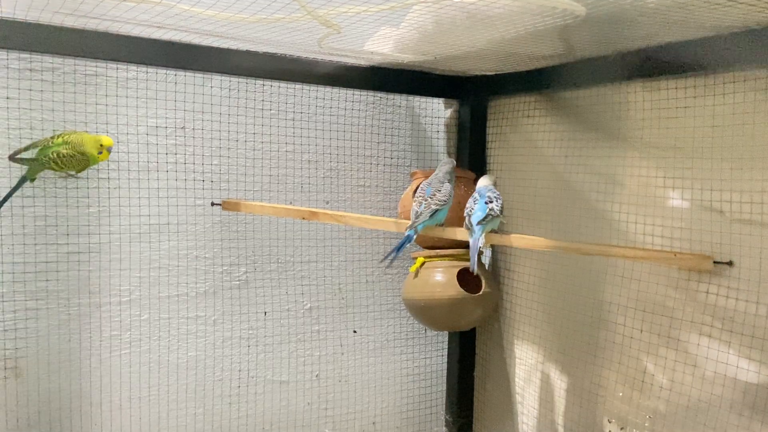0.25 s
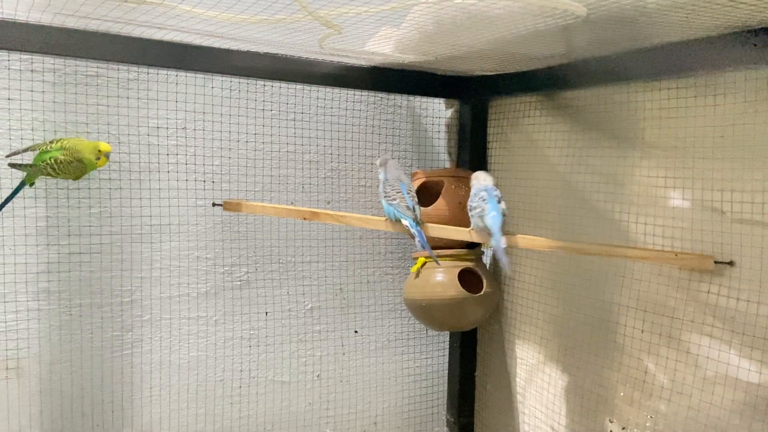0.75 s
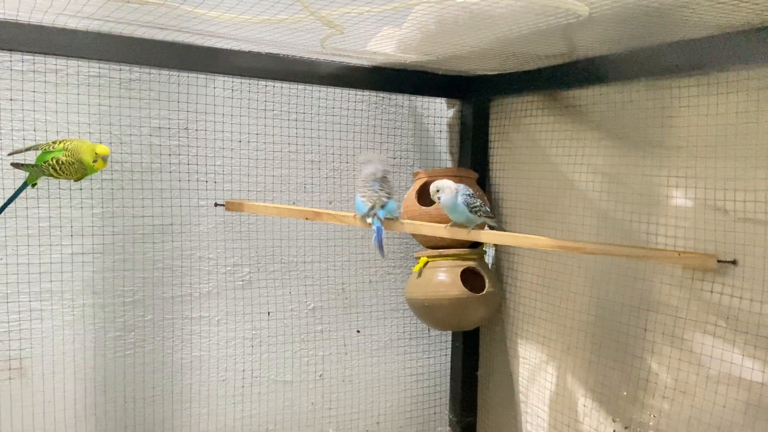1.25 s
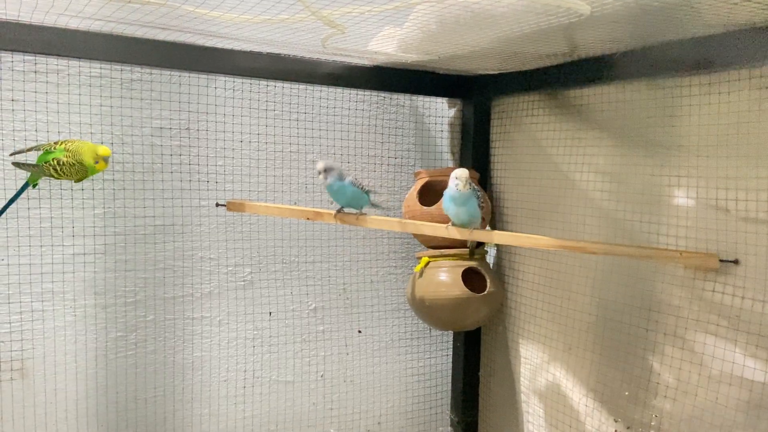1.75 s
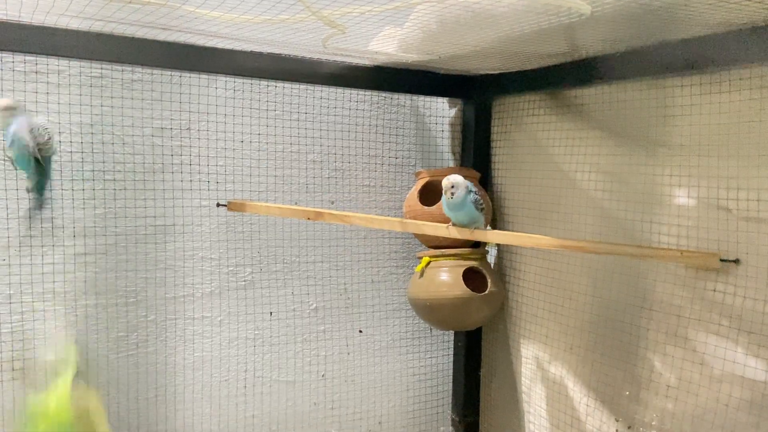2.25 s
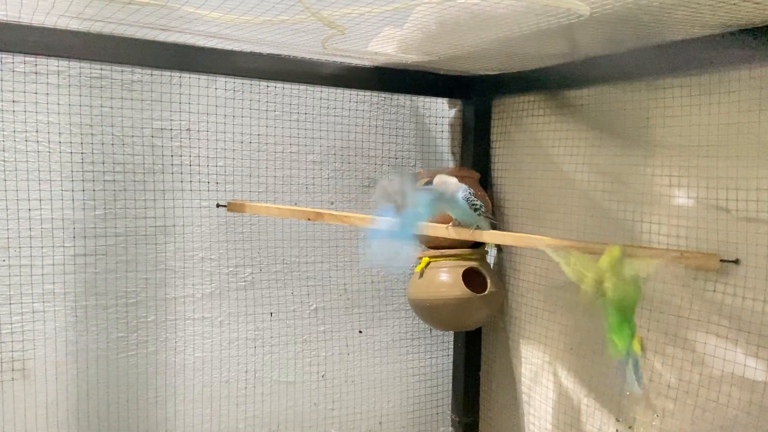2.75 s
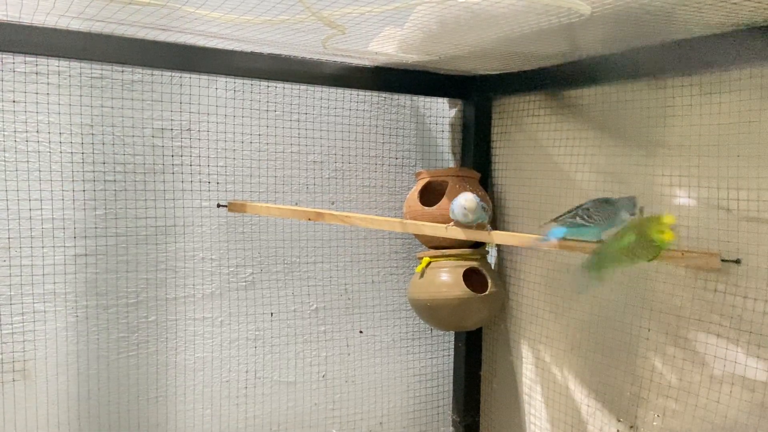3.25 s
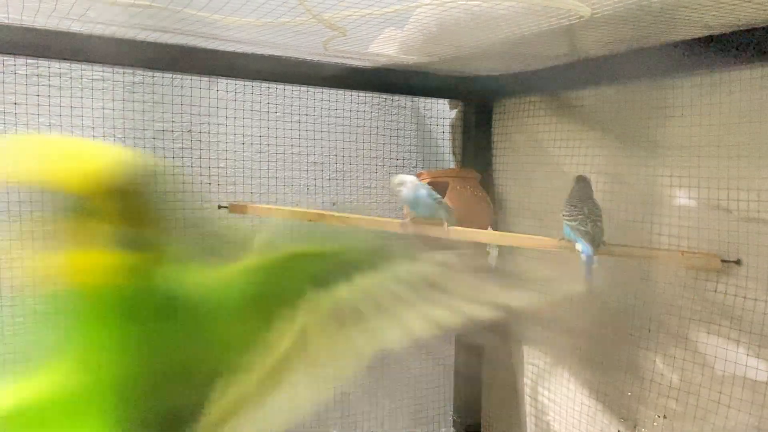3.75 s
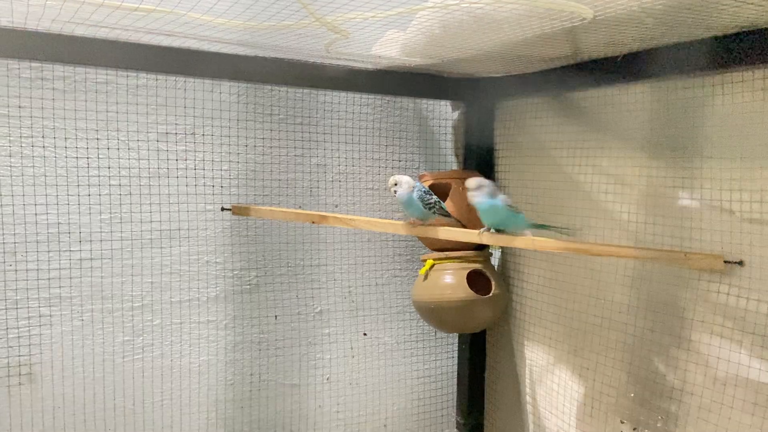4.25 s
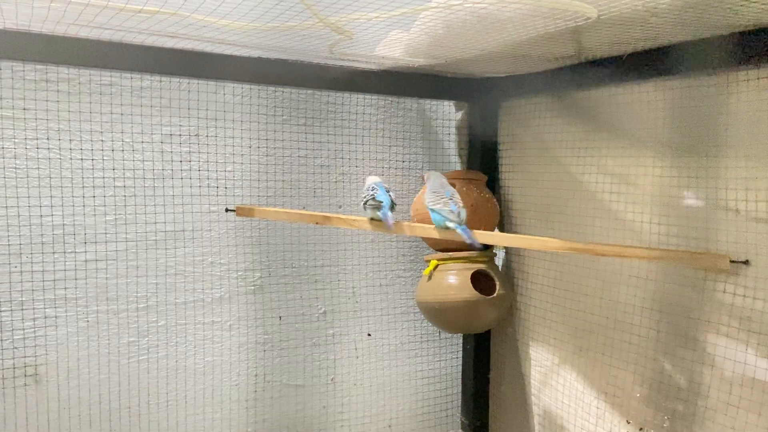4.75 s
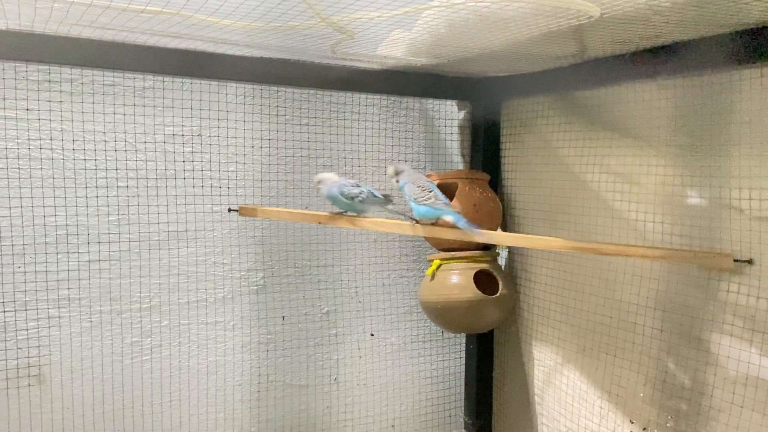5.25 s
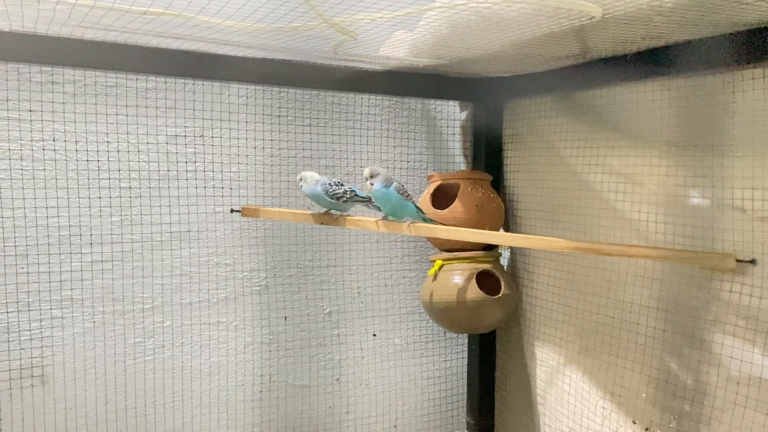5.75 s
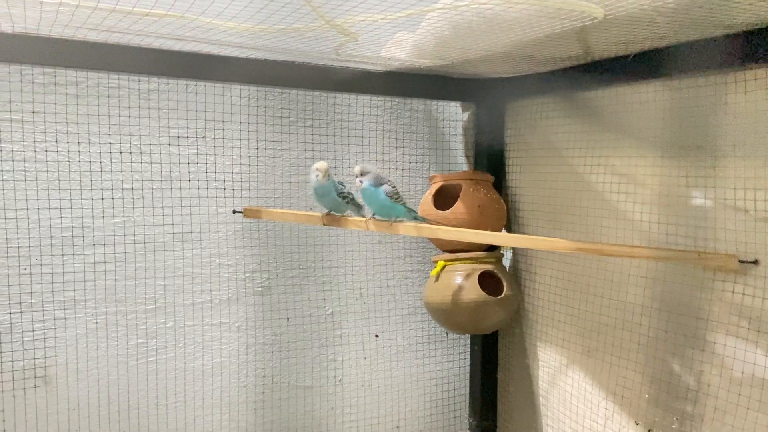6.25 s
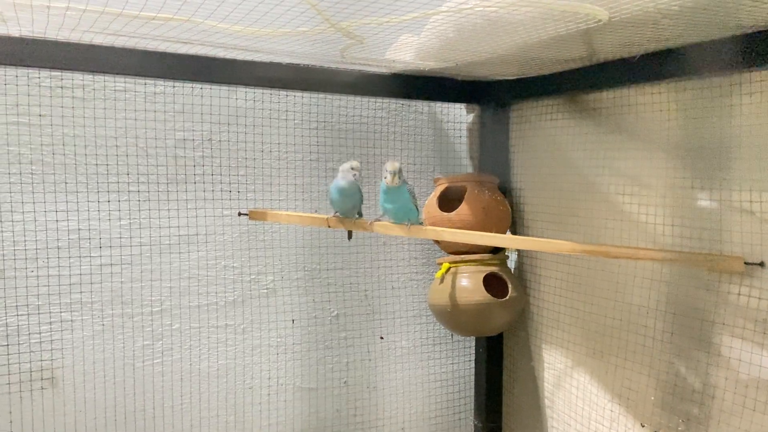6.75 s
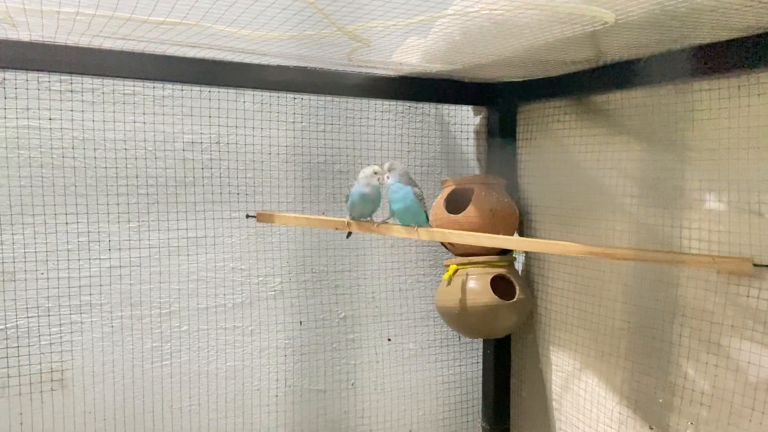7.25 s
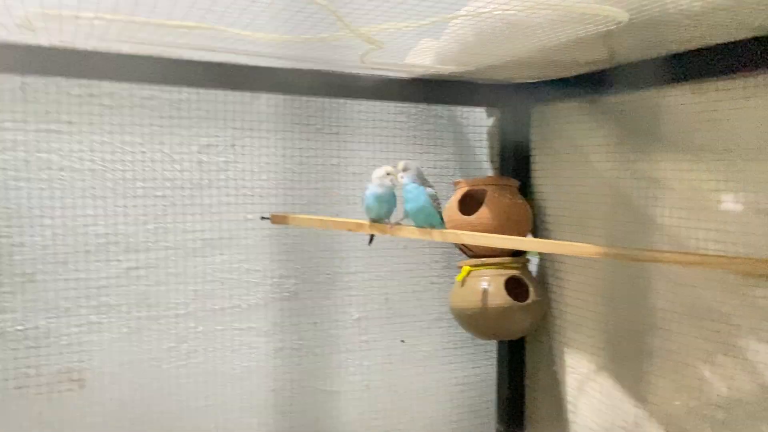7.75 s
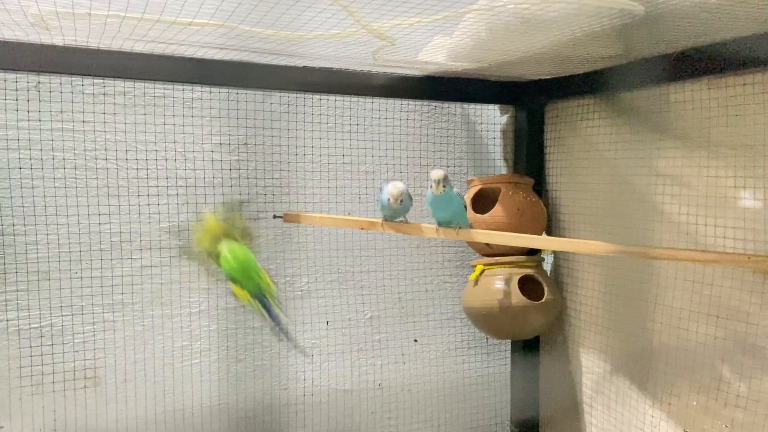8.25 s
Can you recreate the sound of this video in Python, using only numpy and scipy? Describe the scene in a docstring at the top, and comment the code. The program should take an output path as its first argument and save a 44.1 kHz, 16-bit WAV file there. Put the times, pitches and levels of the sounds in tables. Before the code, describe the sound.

Budgerigars chirp, warble and squawk in an echoing indoor aviary, with flutters of wings as one flies close past the microphone.

```python
"""Budgerigars in a mesh aviary inside a hard-walled room. First come short squawks and whistles over
soft hiss and far chatter. Near 2 s a run of harsh squawks begins, made by a voice organ opening in quick
pulses. At 3.4 s a bird flies at the microphone: its calls are the loudest, their echo drops away, and
its wings push thumps of air. Quieter warbling follows, with two taps on the mesh, until more squawks
and wing beats close the scene around 8 s."""
import sys
import numpy as np
from scipy import signal
from scipy.fft import rfft, irfft, next_fast_len
from scipy.io import wavfile
from scipy.ndimage import uniform_filter1d, map_coordinates

SR = 44100
rng = np.random.default_rng(int(sys.argv[2]) if len(sys.argv) > 2 else 0)


def pcm_store(signal):
    """Save signal as 16-bit PCM."""
    levels = np.round(np.clip(np.atleast_2d(signal), -1, 1) * 32767)
    wavfile.write(sys.argv[1], SR, levels.astype(np.int16).T)


N = 373968

# time the room's echo takes to fade by 60 dB: f/Hz, fade/s
ECHO_FADE = [(1000, 0.93), (12000, 0.31)]
# how much echo and hiss differ between left and right: f/Hz, level/dB
STEREO_WIDTH = [(60, -2), (300, -9), (1400, -1), (4000, -4.5), (7000, -4.5), (8200, -42)]
# tone of the background hiss: f/Hz, level/dB
AIR_TONE = [(40, -42), (100, -14), (1000, -18.5), (2500, -8.5), (5000, -14), (8000, -17.5), (12500, -36),
            (16000, -67)]
# bouts of far chatter: t/s, length/s, level/dB, middle pitch/Hz
FAR_BOUTS = [(0.038, 0.19, -45, 2213), (0.404, 0.1, -42, 2817), (0.894, 0.13, -47.5, 2007),
             (1.198, 0.097, -40.5, 2527), (2.403, 0.98, -46, 2500), (4.003, 0.33, -41, 2687),
             (4.561, 0.24, -46.5, 2217), (5.301, 0.31, -51, 2320), (6.094, 0.39, -42, 2484),
             (6.74, 0.22, -42, 2408), (7.205, 0.18, -41.5, 2191), (7.95, 1, -52.5, 2500)]
# feet landing on the perch: t/s, level/dB
PERCH_KNOCKS = [(1.247, -51.5), (1.332, -51.5), (1.892, -48), (3.365, -44), (4.637, -49.5)]
# beaks and claws on the mesh: t/s, level/dB, f/Hz
MESH_TAPS = [(5.457, -43.5, 8000), (7.648, -34, 2790)]
# flights: t/s, length/s, stirred air/dB, feather rustle/dB
FLIGHTS = [(2.047, 0.39, -45.5, -48.5), (2.51, 0.26, -42, -56.5), (3.36, 0.41, -51, -60.5),
           (3.971, 0.29, -50.5, -61.5), (4.599, 0.31, -62, -94), (6.62, 1.2, -55, -65.5),
           (8.081, 0.27, -43, -56.5)]
# tone of rustling feathers: f/Hz, level/dB
FEATHER_TONE = [(130, -1.5), (175, 5), (230, -2.5), (500, -1.5), (1200, -4), (3000, -16)]
# close wing beats: t/s, push/dB
WING_BEATS = [(2.117, -39), (2.209, -42), (3.622, -31), (3.689, -29.5), (3.738, -23.5), (3.799, -36.5),
              (7.912, -40), (8.046, -39.5), (8.084, -33), (8.14, -29), (8.188, -37)]
# warbled notes: t/s, length/s, middle pitch/Hz, level/dB
WARBLE_NOTES = [(0.464, 0.026, 2425, -33), (0.294, 0.027, 2550, -30.5), (0.347, 0.02, 2390, -34),
                (0.527, 0.011, 3800, -38), (3.981, 0.012, 3230, -33.5), (4.832, 0.031, 2770, -40.5),
                (6.827, 0.019, 3080, -36), (0.394, 0.032, 1710, -41), (1.199, 0.036, 2610, -37.5),
                (1.287, 0.013, 2800, -31.5), (1.325, 0.018, 4140, -37.5), (2.602, 0.025, 2490, -26.5),
                (3.037, 0.022, 2614, -33), (3.127, 0.02, 2946, -34.5), (3.176, 0.042, 2984, -32.5),
                (3.234, 0.03, 2425, -28.5), (3.394, 0.044, 2705, -32), (3.958, 0.019, 2106, -39.5),
                (4.019, .018, 1580, -40), (4.214, 0.013, 2072, -33.5), (3.148, 0.026, 2340, -34.5),
                (3.073, .014, 2690, -35.5), (6.307, 0.022, 1970, -37.5), (6.153, 0.024, 2530, -32.5),
                (6.691, .016, 2220, -38), (1.126, .014, 2095, -40), (0.987, 0.038, 2058, -46),
                (5.29, .03, 2415, -47), (5.509, .014, 3100, -40.5), (5.538, .026, 2850, -42),
                (5.556, .03, 2030, -45), (5.506, .03, 1545, -51), (7.364, .03, 2100, -43),
                (4.025, 0.023, 2634, -36.5), (4.075, 0.019, 2664, -29.5), (4.08, 0.021, 2327, -27),
                (4.137, 0.012, 3164, -28), (4.154, 0.03, 2346, -29.5), (4.182, 0.037, 3185, -27),
                (4.239, 0.026, 2365, -29.5), (4.349, 0.014, 1943, -28.5), (5.606, 0.014, 2955, -36.5),
                (5.623, 0.051, 2190, -36.5), (5.651, 0.024, 2970, -27), (5.678, 0.02, 2190, -32.5),
                (6.121, 0.026, 2204, -31.5), (6.248, 0.02, 2605, -39), (6.73, 0.033, 2400, -32.5),
                (6.767, 0.057, 1970, -33), (6.95, 0.012, 2470, -33), (7.256, 0.041, 1151, -48)]
# wide whistled slides: t/s, length/s, first pitch/Hz, last pitch/Hz, level/dB
PITCH_SLIDES = [(1.231, 0.024, 3714, 2690, -29.5), (1.312, 0.034, 2895, 1944, -33.5),
                (3.479, 0.017, 2820, 2030, -30.5), (4.638, 0.035, 2610, 1982, -37),
                (4.848, 0.033, 2035, 1534, -43), (4.793, 0.027, 3950, 2480, -37),
                (5.492, 0.03, 5170, 3440, -40), (5.704, 0.022, 2820, 1943, -27),
                (5.351, 0.035, 2405, 3000, -41), (6.086, 0.0367, 860, 1410, -51.5),
                (0.505, 0.039, 2850, 3866, -35), (7.93, 0.024, 4005, 3090, -44),
                (5.718, 0.018, 5000, 3750, -43.5), (6.096, 0.044, 3790, 2220, -40),
                (6.358, 0.019, 2727, 2170, -32), (6.675, 0.046, 5080, 3140, -42),
                (6.848, 0.038, 2405, 1965, -41), (6.869, 0.055, 3290, 2830, -36.5),
                (7.085, 0.1, 1825, 3850, -46), (7.161, 0.044, 1617, 2610, -44),
                (7.319, 0.074, 979, 1898, -46.5)]
# how the throat colours a squawk: f/Hz, level/dB
THROAT_TONE = [(1300, -26.5), (2300, -5), (3300, -3), (4500, 2.5), (6500, 1), (7600, -4), (8800, -10.5),
               (12000, -17), (16000, -29)]
# squawks and short chips: t/s, length/s, treble level/dB, pitch/Hz
SQUAWK_CALLS = [(0.194, 0.012, -37, 2430), (0.299, 0.03, -27, 2214), (0.463, 0.063, -38, 3030),
                (0.568, 0.056, -18.5, 3583), (0.995, 0.0091, -53, 2185), (1.462, 0.048, -27.5, 2307),
                (1.671, 0.033, -28.5, 3530), (1.783, 0.043, -14, 3490), (1.912, 0.094, -20.5, 3550),
                (2.006, 0.07, -21, 3130), (2.083, 0.023, -14, 3353), (2.128, 0.091, -16.5, 3334),
                (2.309, 0.12, -16.5, 3373), (2.536, 0.061, -21, 3057), (2.704, 0.018, -24, 3270),
                (2.787, 0.056, -25.5, 3100), (2.86, 0.033, -25, 2970), (2.958, 0.04, -34.5, 2822),
                (3.405, 0.037, -9.5, 3307), (3.563, 0.034, -8, 3210), (3.722, 0.075, -9, 3158),
                (4.199, 0.0096, -34, 2250), (4.927, 0.0381, -41, 2957), (6.334, 0.0094, -34.5, 2320),
                (6.454, 0.035, -22, 3170), (6.547, 0.023, -29, 3004), (7.442, 0.052, -26, 3193),
                (7.741, 0.0097, -30.5, 4500), (7.75, 0.063, -19, 3320), (7.959, 0.05, -13.5, 3250),
                (8.111, 0.092, -16.5, 3310), (8.314, 0.097, -17.5, 2968)]


def amp(db):
    """Turn decibels into a multiplier."""
    return 10 ** (np.asarray(db) / 20)


def unit(x):
    """Scale a sound to an average power of 1."""
    return x / np.sqrt(np.mean(x ** 2) + 1e-20)


def along(points, hz):
    """Read between the rows of a (frequency, value) table, on a log frequency scale."""
    f, v = np.transpose(points)
    return np.interp(np.log(hz + 1), np.log(f + 1), v)


def wobble(rate, size=N):
    """A smooth curve through `rate` random values a second."""
    knots = rng.standard_normal(int(size * rate / SR) + 4)
    return map_coordinates(knots, [np.arange(size) * rate / SR])


def filtered(x, response):
    """Scale and shift each frequency in x by response(hz)."""
    m = next_fast_len(N + SR // 2)
    return irfft(rfft(x, m) * response(np.fft.rfftfreq(m, 1 / SR)), m)[..., :N]


def add(track, s, sound):
    """Mix a sound into a track at s seconds."""
    part = track[..., round(s * SR):][..., :sound.shape[-1]]
    part += sound[..., :part.shape[-1]]


def bouts(starts, lengths, levels_db, rest_db, rise=247.5, fall=71):
    """A level in dB that climbs from rest, holds and sinks for each bout (slopes in dB a second)."""
    t, level = np.arange(N) / SR, np.full(N, float(rest_db))
    for s, length, db in zip(starts, lengths, levels_db):
        before, after = np.maximum(s - t, 0), np.maximum(t - s - length, 0)
        level = np.maximum(level, db - rise * before - fall * after)
    return level


def room(sound):
    """Hard walls give a fresh echo. Rows: mid (what left and right share) and side (how they differ)."""
    hz, t, noise = signal.stft(rng.standard_normal((2, SR // 3)), SR, nperseg=256)
    decay = amp(-60 * t / along(ECHO_FADE, hz)[:, None])
    first_bounces = 1 + 2.95 * np.exp(-t / 0.015)
    tail = signal.istft(noise * decay * first_bounces, SR, nperseg=256)[1]
    return signal.fftconvolve(sound[None], tail / np.linalg.norm(tail[0]), axes=1)


def hiss(tone):
    """Noise from all around (mid and side rows), in patches of random strength."""
    even = signal.stft(rng.standard_normal((2, N)), nperseg=512)[2]
    patches = uniform_filter1d(rng.standard_normal(even.shape[1:]), size=9, axis=0)
    patches = uniform_filter1d(patches, size=9, axis=1)
    noise = signal.istft(even * amp(3 * unit(patches)), nperseg=512)[1][:, :N]
    return unit(filtered(noise, lambda hz: amp(along(tone, hz))))


def far_chatter():
    """Five birds further off sing chains of raspy syllables that mostly fall in pitch."""
    starts, lengths, levels_db, middles_hz = zip(*FAR_BOUTS)
    track, middle_hz = np.zeros(N), np.interp(np.arange(N) / SR, starts, middles_hz)
    for pitch_share, db in [(1, 0)] * 4 + [(.55, -7.5)]:  # one mutters lower and softer
        count = np.cumsum(np.maximum(38 * (1 + .4 * wobble(15)), 5)) / SR  # about 38 syllables a second
        syllable, progress = count.astype(int), count % 1
        centre, glide, strength = rng.standard_normal((3, syllable[-1] + 1))[:, syllable]
        bend = 0.29 * np.tanh(centre) + (.2 * glide - .2) * (progress - .5) + 0.075 * wobble(400)
        phase = 2 * np.pi * np.cumsum(pitch_share * middle_hz * np.exp(bend)) / SR
        shape = np.sin(np.pi * progress) ** 2 * amp(3 * strength + 5.1 * wobble(300))
        track += amp(db) * shape * (np.sin(phase) + amp(-13) * np.sin(2 * phase))
    return amp(bouts(starts, lengths, levels_db, rest_db=-63.5, rise=129, fall=106)) * unit(track)


def perch_knocks():
    """The long perch bends: its high tones arrive first, so each knock is a quick falling thud."""
    track, t = np.zeros(N), np.arange(SR // 25) / SR
    pitch_hz = 110 + 500 * np.exp(-t / 0.0044)
    thud = np.sin(2 * np.pi * np.cumsum(pitch_hz) / SR) * amp(-60 * t / 0.4)
    for s, db in PERCH_KNOCKS:
        add(track, s, amp(db) * thud)
    return track


def mesh_taps():
    """A beak or claw hits the mesh: a tiny, dry burst of noise."""
    track, t = np.zeros(N), np.arange(SR // 50) / SR
    for s, db, hz in MESH_TAPS:
        band = signal.butter(3, [hz / 2.2, hz * 1.7], "bandpass", fs=SR)
        noise = unit(signal.lfilter(*band, rng.standard_normal(len(t))))
        add(track, s, amp(db - 60 * t / 0.036) * noise)
    return track


def feathers(flaps_per_s=17, swing_db=5):
    """Feathers rustle, louder in flight, swelling with every flap."""
    starts, lengths, _, levels_db = zip(*FLIGHTS)
    rustle_db = bouts(starts, lengths, levels_db, rest_db=-65)
    flaps = np.sin(2 * np.pi * np.cumsum(flaps_per_s * (1 + 0.16 * wobble(6.4))) / SR)
    return amp(rustle_db + swing_db * flaps + 3.5 * wobble(24)) * hiss(FEATHER_TONE)


def wing_thumps(ring_hz=57):
    """Pushes from wings and stirred air make the microphone ring at a low pitch."""
    pushes = np.zeros(N)
    for s, db in WING_BEATS:
        add(pushes, s - .004, -amp(db) * np.hanning(420))
    ring = lambda hz, width: 1j * hz * width / (ring_hz ** 2 - hz ** 2 + 1j * hz * width)
    thumps = filtered(pushes, lambda hz: 4 * ring(hz, 21))
    starts, lengths, levels_db, _ = zip(*FLIGHTS)
    stir_db = bouts(starts, lengths, levels_db, rest_db=-67.5)
    stir = filtered(rng.standard_normal(N), lambda hz: ring(hz, 6.5) * hz ** 2 / (hz ** 2 + 45 ** 2))
    return thumps + amp(stir_db + 3.7 * wobble(3.6)) * unit(stir)


def whistle(length, first_hz, last_hz, hook=0):
    """A gliding note that starts too high by the share `hook`. Low notes are rougher and richer."""
    size = round(length * SR)
    progress = np.arange(size) / size
    rasp = .028 + 30.3 / first_hz  # shakes both pitch and strength
    glide_hz = first_hz + (last_hz - first_hz) * progress
    pitch_hz = glide_hz * (1 + hook * np.exp(-progress / 0.175) + rasp * wobble(303.4, size))
    phase = 2 * np.pi * np.cumsum(pitch_hz) / SR
    shape = np.sin(np.pi * progress) ** 0.39 * np.exp(10 * rasp * wobble(303, size))
    richness = amp(-28 * np.clip(pitch_hz / 1100 - .8, 0, 1))
    return shape * (np.sin(phase) + richness * (np.sin(2 * phase) + 0.99 * np.sin(3 * phase)))


def warble(sag_hz=79.4):
    """Perched birds whistle slightly sinking notes and wide slides."""
    track = np.zeros(N)
    for s, length, hz, db in WARBLE_NOTES:
        add(track, s, amp(db) * whistle(length, hz + sag_hz / 2, hz - sag_hz / 2, hook=0.1067))
    for s, length, first_hz, last_hz, db in PITCH_SLIDES:
        add(track, s, amp(db) * whistle(length, first_hz, last_hz))
    return track


def squawk(length, pitch_hz, climb=.14):
    """The bird's voice organ opens in quick uneven pulses, letting out a shaky tone and rushing air."""
    size = round(length * SR)
    progress = np.arange(size) / size
    pulse_hz = rng.uniform(170, 210) * (1 + .12 * wobble(60, size))
    count = np.cumsum(pulse_hz) / SR
    pulses = rng.uniform(.05, .3) + .4 * progress + np.sin(np.pi * count) ** 2
    pulses *= amp(2.5 * wobble(150, size))
    jumps = rng.standard_normal(int(count[-1]) + 1)[count.astype(int)]  # each pulse has its own pitch
    drift = .06 * wobble(30, size) + .075 * jumps + .07 * wobble(500, size)
    phase = 2 * np.pi * np.cumsum(pitch_hz * (1 + drift + climb * (progress - .5))) / SR
    tone = np.sin(phase) + np.sin(2 * phase) + 0.74 * np.sin(3 * phase)
    voice = pulses * (tone + 1.05 * rng.standard_normal(size))
    fade_in = np.clip(progress * length / min(0.012, 0.5 * length) + 0.19, 0, 1)
    fade_out = np.clip((1 - progress) / 0.17 + 0.065, 0, 1)
    return fade_in * fade_out * unit(voice)


def close_squawks(swoop_s=3.404, arrive_s=3.8, split_hz=4600):
    """All the squawks and their echoes, with the treble and the lower part each shaped by the throat."""
    direct, echoes = np.zeros((2, N)), np.zeros((2, 2, N))
    for s, length, db, pitch_hz in SQUAWK_CALLS:
        lower_gain = amp(-2.5 + 0.63 * max(-18 - db, 0))  # softer calls are duller
        echo_db = -6 if length < .02 else 0  # short chips get less echo
        if swoop_s < s < arrive_s:  # a bird flies at the microphone, leaving the room behind
            echo_db = -14 - 11.5 * (s - swoop_s)
        call = amp(db) * squawk(length, pitch_hz)
        echo = amp(echo_db) * room(np.pad(call, (250, 0)))
        add(direct, s, np.array([call, lower_gain * call]))
        add(echoes, s, np.array([echo, lower_gain * echo]))
    low = lambda hz: 1 / (1 + (hz / split_hz) ** 12)
    throat = lambda hz: amp(along(THROAT_TONE, hz)) * [1 - low(hz), low(hz)]
    return filtered(direct, throat).sum(0), filtered(echoes, lambda hz: throat(hz)[:, None]).sum(0)


def scene():
    """Mix the birds and their room into left and right."""
    near, around = close_squawks()
    notes, distant = warble(), far_chatter()
    song = amp(-6) * notes + amp(-5) * distant
    for start in range(0, N, SR // 4):  # the birds move, so the echo keeps changing
        add(around, start / SR, room(song[start:start + SR // 4]))
    around += feathers() + amp(-54 + 1.5 * wobble(5.5)) * hiss(AIR_TONE)
    direct = near + notes + amp(-4) * distant + mesh_taps()
    mid = direct + around[0] + wing_thumps() + perch_knocks()
    # below the high treble, direct sound reaches the left a little louder and earlier
    lean = lambda hz: (0.19 + .4j) / (1 + (hz / 6500) ** 8)
    side = filtered(around[1], lambda hz: amp(along(STEREO_WIDTH, hz))) + filtered(direct, lean)
    return np.array([mid + side, mid - side])


def record(dry, shift_above_hz=6850, top_hz=16000):
    """Slow volume control dips the lower tones after loud calls; left and right treble go out of step."""
    power = signal.lfilter([1 / 7000], [1, 1 / 7000 - 1], np.mean(dry ** 2, 0))
    excess_db = np.maximum(10 * np.log10(power + 1e-12) + 22, 0)
    low = filtered(dry, lambda hz: 1 / (1 + (hz / 1600) ** 6) * (hz > 120))
    dipped = dry + (amp(-1.8 * excess_db) - 1) * low
    rounded = dipped / (1 + dipped ** 4) ** (1 / 4)  # the highest peaks are gently flattened
    opposite = np.array([[1], [-1]])
    shift = lambda hz: np.exp(-.5j * np.pi * np.maximum(hz - shift_above_hz, 0) / 2210 * opposite)
    return filtered(rounded, lambda hz: shift(hz) * (hz < top_hz))


dry = scene()
out = record(dry)
pcm_store(out)
```